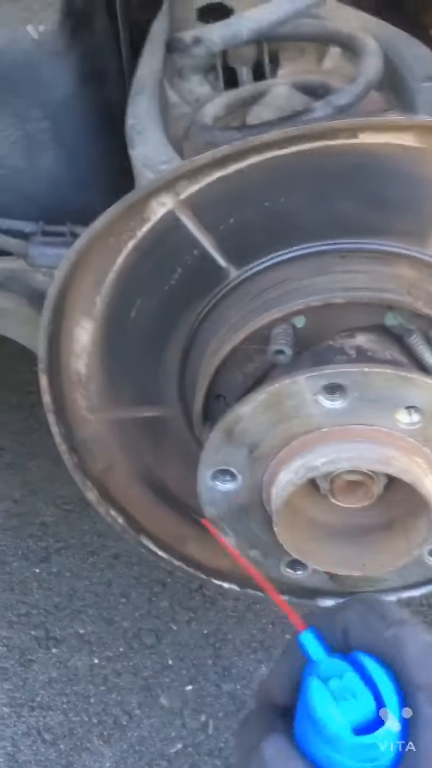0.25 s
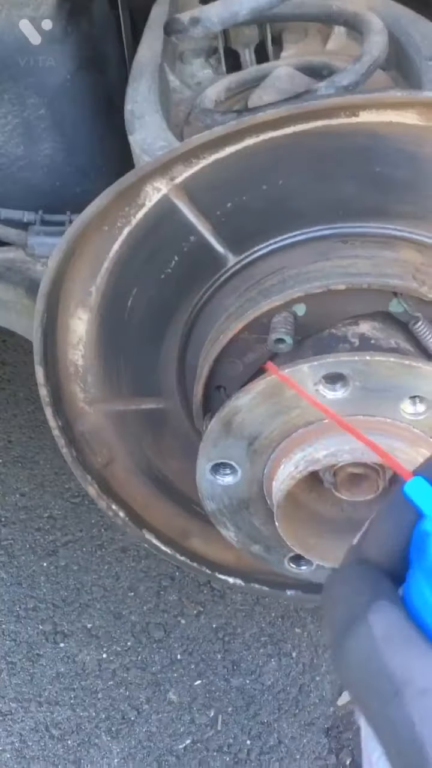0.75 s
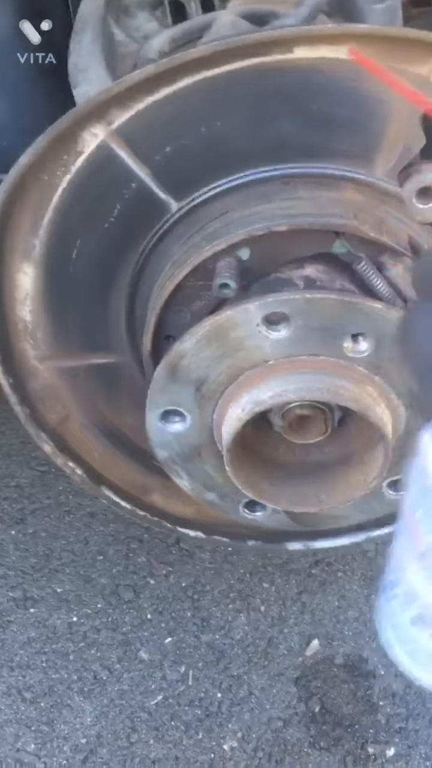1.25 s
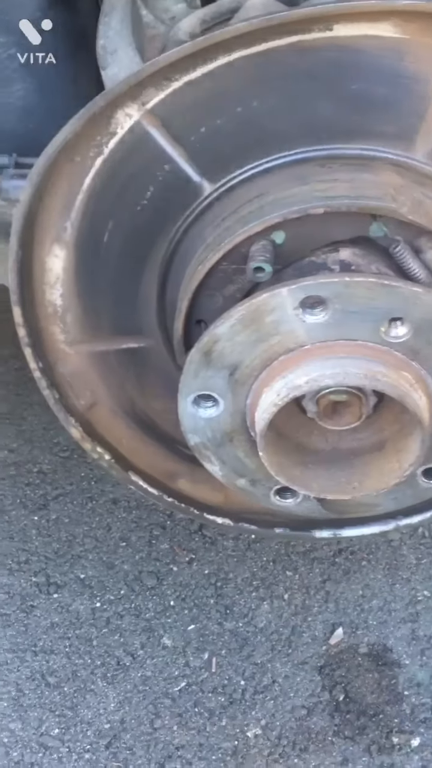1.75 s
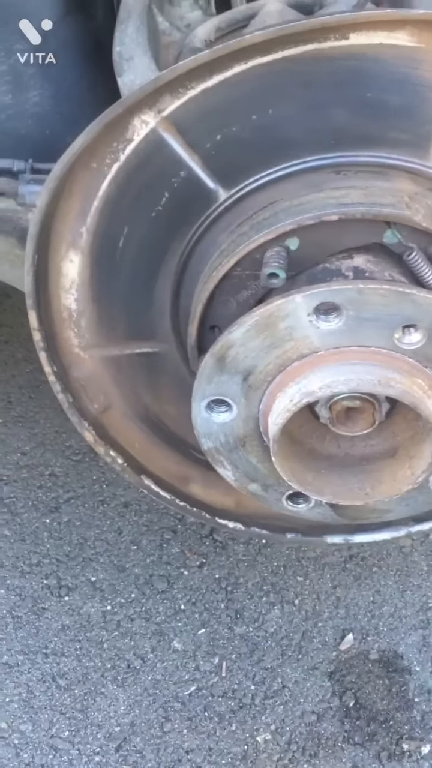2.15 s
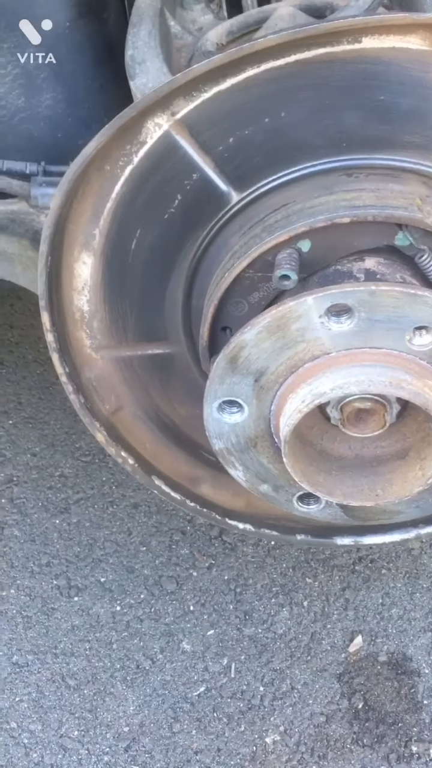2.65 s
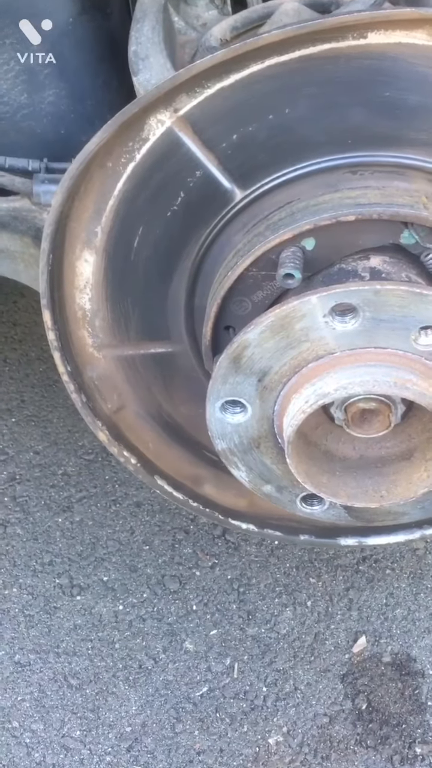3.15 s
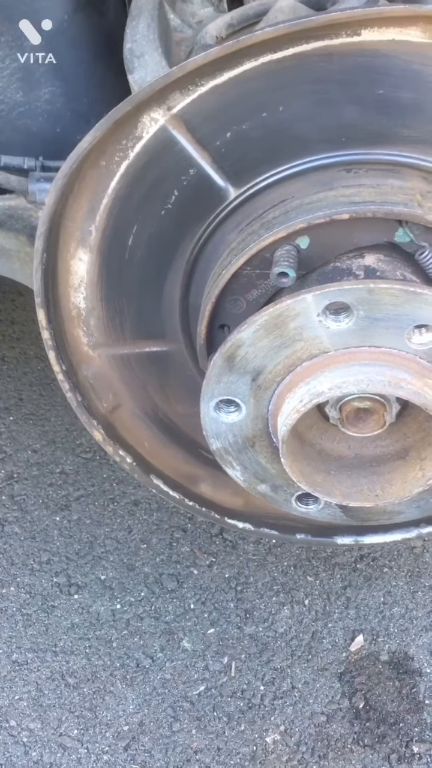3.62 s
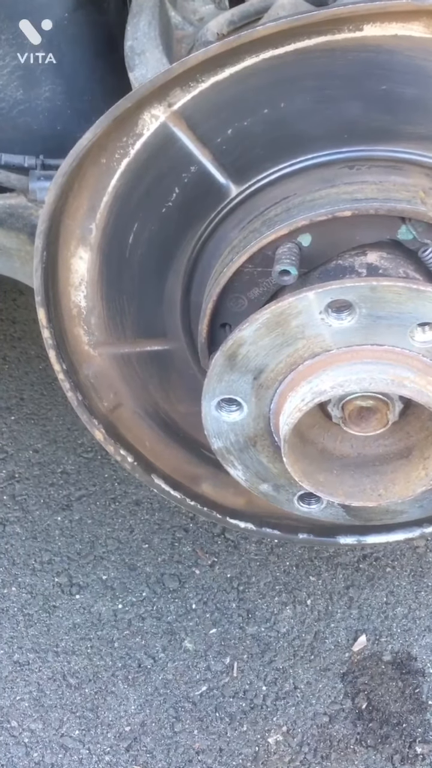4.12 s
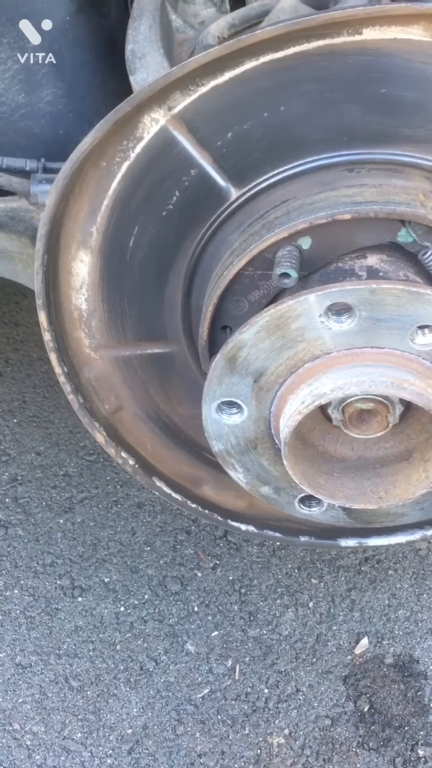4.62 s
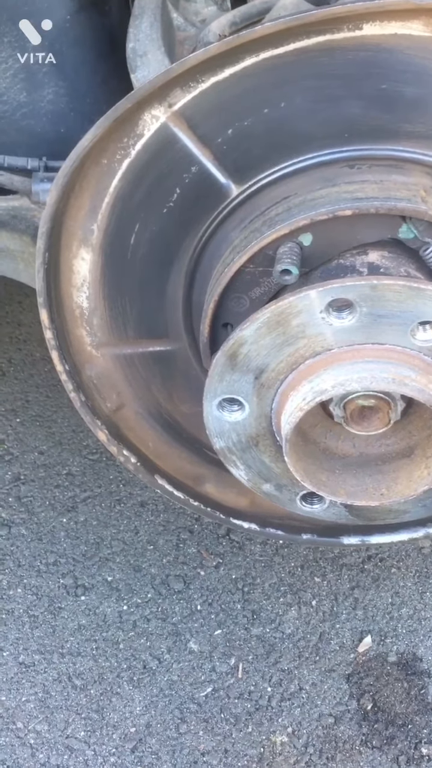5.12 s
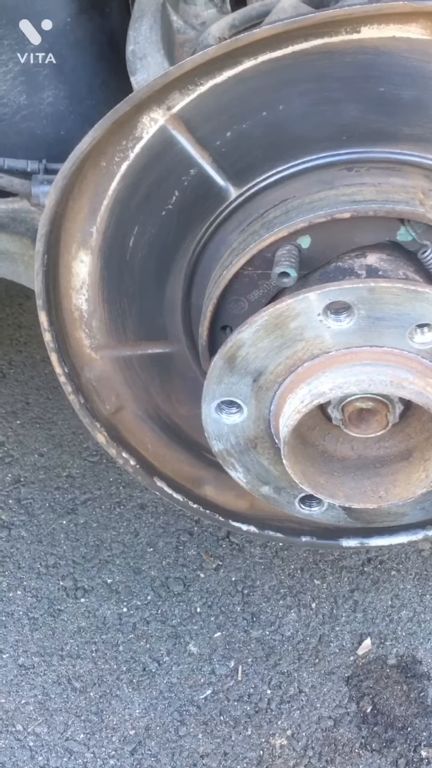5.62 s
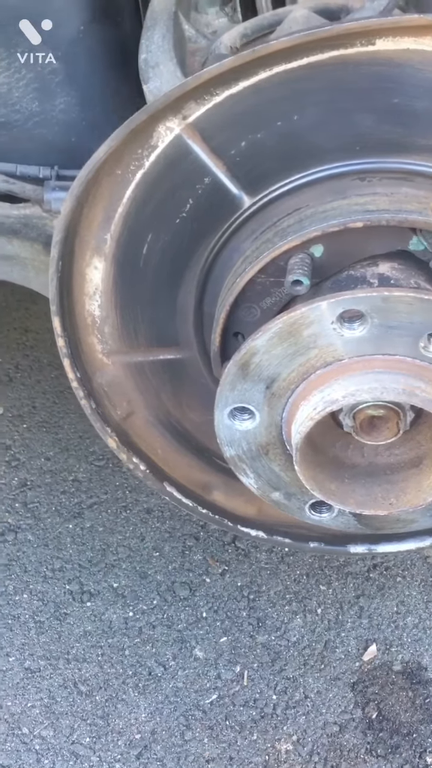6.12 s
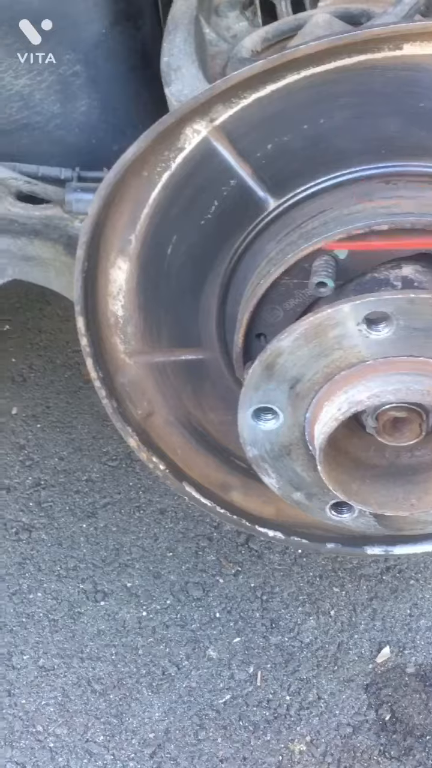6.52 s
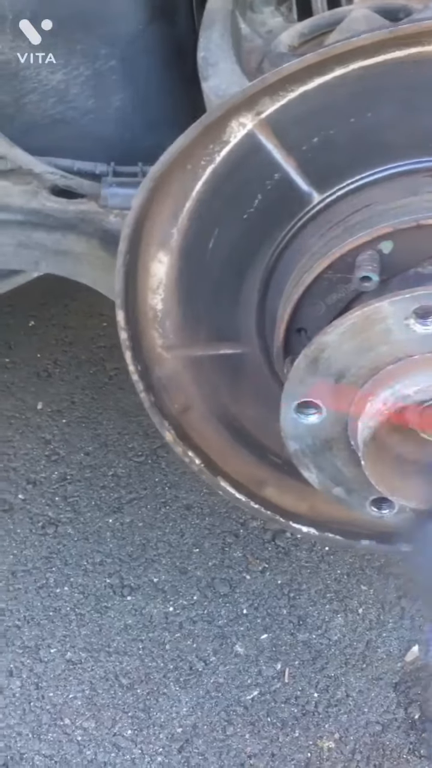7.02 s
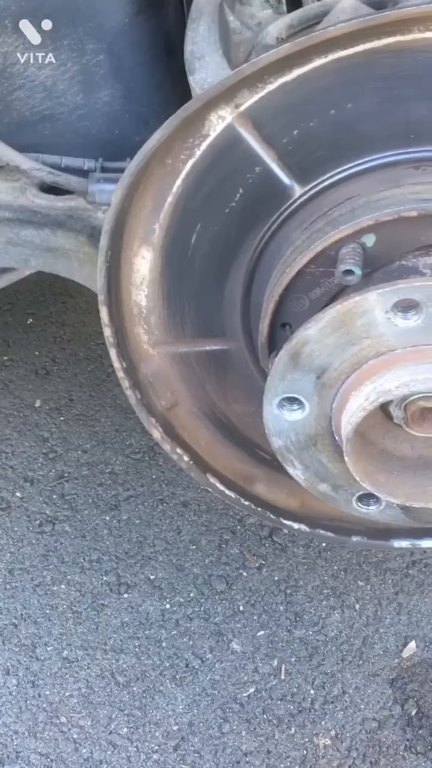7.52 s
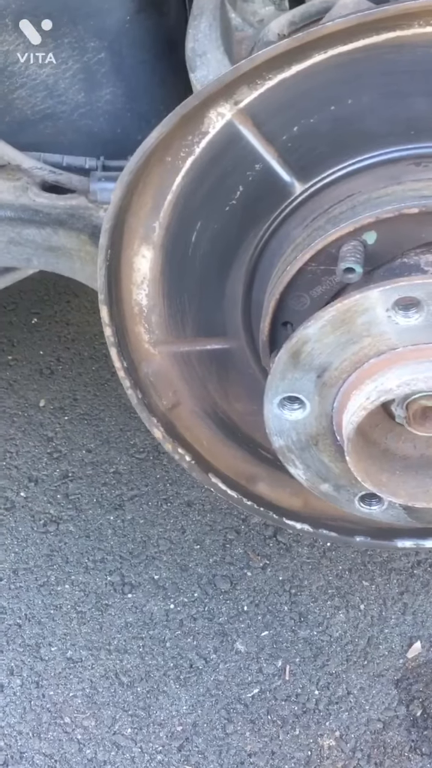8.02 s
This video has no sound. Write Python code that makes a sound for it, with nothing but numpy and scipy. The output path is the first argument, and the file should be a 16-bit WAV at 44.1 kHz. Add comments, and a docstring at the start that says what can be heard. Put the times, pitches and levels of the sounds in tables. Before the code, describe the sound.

Close, loud spray-can bursts hiss and splash against hollow steel, about three a second, with one straw tap before a final sustained hiss.

```python
"""Outdoors by a car: an aerosol can with a thin straw is sprayed in bursts into a steel brake drum, close by.
The jet hisses, splashes and sounds the drum's hollow: shaped noises gated by one valve. Steel modes ring on.
Its wind gusts and thuds on the microphone, a dry puff falls between two bursts, the straw taps the hub once.
Traffic rumbles far off, the air is still and an insect buzzes: slow noises. The loudest peaks clip."""
import sys
import numpy as np
from scipy import signal
from scipy.io import wavfile
from scipy.ndimage import uniform_filter1d, map_coordinates

SR = 44100
rng = np.random.default_rng(int(sys.argv[2]) if len(sys.argv) > 2 else 0)


def transcribe(u):
    """Save the signal u as a 16-bit wav file named by the first command-line argument.

    u: samples, shape (n,) or (channels, n), limited to [-1, 1]; the rate is SR.
    q: integer samples, one column per channel.
    """
    v = np.clip(np.atleast_2d(u).T, -1, 1)
    q = np.round(v * 32767).astype(np.int16)
    wavfile.write(sys.argv[1], SR, q)


def field_ratio(decibels):
    """Amplitude ratio for a level in dB (20 dB per decade); scalars and array-likes work."""
    return 10 ** (np.asarray(decibels, dtype=float) / 20)


N = 364266
T = np.arange(N) / SR

# spray bursts, one list each, valve fully open to start of closing: t/s, jet level/dB, drum over jet/dB
BURST_PATHS = [
    [(0.0, -16.5, -1), (0.054, -17.5, -14), (0.12, -19.5, -11.5)],
    [(0.26, -11.5, -19), (0.306, -16.5, -14), (0.322, -10.5, -15.5), (0.362, -22.5, -5),
     (0.398, -18.5, -15), (0.425, -22, -3.5)],
    [(0.575, -13.5, -14.5), (0.631, -14.5, -3), (0.725, -16, -3.5), (0.735, -17.5, -6.5)],
    [(0.88, -15, -14.5), (0.884, -15.5, -9.5), (0.95, -14.5, -5), (1.052, -16, -12.5),
     (1.065, -17.5, -13.5)],
    [(1.207, -15, -7.5), (1.219, -17, -8), (1.301, -15, -11), (1.369, -17.5, -2.5), (1.383, -8.5, -8.5),
     (1.39, -14.5, -10.5)],
    [(1.548, -9, -1), (1.572, -10.5, 5), (1.622, -12, -1.5), (1.716, -16.5, 5.5), (1.725, -14.5, 4)],
    [(1.873, -14.5, 6.5), (1.877, -15.5, 2.5), (1.977, -13.5, -7.5), (2.011, -15, -3.5),
     (2.083, -5.5, -9.5), (2.092, -19, -6)],
    [(2.24, -18.5, 7.5), (2.268, -16.5, 1.5), (2.29, -11.5, -1.5), (2.344, -10, -6), (2.432, -17.5, 3.5)],
    [(2.613, -9, -4), (2.669, -8, -8.5), (2.763, -16, 4), (2.807, -8.5, -7), (2.836, -15, -2)],
    [(2.988, -11.5, -4.5), (3.004, -7.5, -12), (3.194, -11, -12), (3.208, -12.5, 3)],
    [(3.375, -14, 2), (3.385, -12.5, -3), (3.443, -9, -20), (3.487, -16.5, 0), (3.607, -13, -6.5),
     (3.612, -20.5, 1.5)],
    [(3.763, -11.5, -6), (3.829, -19.5, 7), (3.957, -19, 2.5), (3.977, -11.5, -10), (3.983, -16.5, -10)],
    [(4.147, -6, -6.5), (4.183, -8.5, -15.5), (4.289, -11, -18.5), (4.331, -9.5, -7.5),
     (4.347, -11.5, -13.5), (4.363, -18.5, 1.5)],
    [(4.502, -8.5, -6.5), (4.516, -7, -14), (4.702, -13, -12.5), (4.705, -15.5, -6)],
    [(4.83, -16.5, -13), (4.862, -15, -16), (5.01, -16.5, -13.5), (5.013, -18, -10)],
    [(5.102, -13, -13), (5.144, -6, -17.5), (5.303, -15, -9)],
    [(5.397, -10, -14), (5.407, -8.5, -14), (5.457, -11.5, -11.5), (5.501, -10, -15.5), (5.577, -11.5, -13),
     (5.6, -20.5, -6)],
    [(5.737, -12, -10.5), (5.759, -9, -13.5), (5.847, -12, -10), (5.905, -8, -19.5), (5.933, -19.5, -6.5)],
    [(6.081, -8.5, -9.5), (6.185, -17.5, -2), (6.263, -9, -14), (6.28, -21.5, -1)],
    [(6.42, -20, -4), (6.466, -17, -3), (6.588, -18, -5), (6.613, -17.5, -14)],
    [(6.737, -16.5, -24), (6.751, -15, -18), (6.901, -19, -15), (6.923, -14, -12), (6.939, -14.5, -20),
     (6.945, -23.5, -7.5)],
    [(7.185, -18, -11), (7.193, -18, -3), (7.257, -20, -8), (7.277, -11, -19.5), (7.341, -13.5, 2),
     (7.472, -18, 2.5)],
    [(7.676, -12, -3), (7.682, -12.5, 1.5), (7.818, -13.5, -3), (7.892, -16, 5), (7.928, -11.5, -9),
     (7.98, -20, 3.5), (8.032, -18, 9), (8.104, -10, -13.5), (8.152, -14, -3.5), (8.26, -15, -12.5)],
]
# modes of backing plate and drum: f/Hz, relative level/dB, t60/s
SHELL_MODES = [(869, 0, .6), (950, -2, .5), (1040, -3, .4), (1392, -6, .4), (1625, -6, .4), (2363, -7, .4),
               (2412, -7, .5), (2665, -9, .4), (2815, -9, .6), (3015, -9, .4), (3095, -8, .6),
               (3270, -9, .4), (3870, -13, .4), (4013, -12, .4), (4837, -14, .5), (5108, -12, .9),
               (7210, -14, .4), (8269, -14, .7), (9227, -16, .5), (11528, -16, .7), (15057, -17, .6)]
# modes of the hub: f/Hz, relative level/dB, t60/s
HUB_MODES = [(5146, 0, .78), (8290, -8, .5), (11567, 0, .5), (15651, -8, .5)]
# colour of tap and puff: f/Hz, relative density/dB per Hz
CRACK_COLOUR = [(600, -25.5), (1500, -12), (4000, -14.5), (8000, -7), (12500, -1.5), (15700, 2.5)]


def unit(x):
    """Scaled to rms 1."""
    return x / np.sqrt(np.mean(x ** 2) + 1e-20)


def along(points, hz):
    """(f/Hz, level/dB) points read on a log frequency axis, -90 dB outside."""
    f, v = np.transpose(points)
    return np.interp(np.log(hz + 1), np.log(f + 1), v, -90, -90)


def curve(points):
    """(t/s, value) points read along the scene."""
    return np.interp(T, *np.transpose(points))


def wobble(rate_hz):
    """A smooth random curve, rate_hz knots a second."""
    return map_coordinates(rng.standard_normal(int(N * rate_hz / SR) + 4), [T * rate_hz])


def bump(s, ms):
    """A Gaussian of height 1 and standard deviation ms."""
    return np.exp(-.5 * ((T - s) * 1000 / ms) ** 2)


def noise(colour_db, stripes_db, patchy_db, size=512):
    """Noise of rms 1: random stripes stand for echoes off near parts, brief patches for turbulence."""
    hz, t, z = signal.stft(rng.standard_normal(N), SR, nperseg=size)

    def field(bins, frames):
        rough = rng.standard_normal(z.shape)
        return unit(uniform_filter1d(uniform_filter1d(rough, bins, 0), frames, 1))

    texture_db = stripes_db * field(2, 36) + patchy_db * field(14, 6)
    gain = field_ratio(colour_db(hz[:, None], t) + texture_db)
    gain /= np.sqrt(np.mean(gain ** 2, 0))  # colour leaves the level alone
    return unit(signal.istft(z * gain, SR, nperseg=size)[1][:N])


def steady(points):
    """A colour that does not change in time."""
    return lambda hz, t: along(points, hz) + 0 * t


def ringing(modes):
    """Impulse response, 1 s long: a sum of decaying sines."""
    t = T[:SR]
    return sum(field_ratio(db - 60 * t / t60) * np.sin(2 * np.pi * hz * t) for hz, db, t60 in modes)


def valve_db():
    """0 dB while open; the opening is steep at first and rounds off, the closing is a straight dB ramp."""
    # how briskly the finger works the valve, per burst: opening steepness/(1/ms), closing rate/(dB/ms)
    valve_rates = [(1.5, 1), (1.3, 1.5), (1.3, 1.5), (1.43, 1.5), (1.5, 1.5), (1.66, 2.5), (1.92, 1),
                   (1.4, 2), (1.8, 1.5), (1.8, 3), (1.87, 2), (1.8, 1.5), (1.7, 2), (1.7, 1), (1.24, 1.5),
                   (1.5, 1.5), (1.8, 1.5), (1.9, 1.5), (2.3, 1), (1.37, 1.5), (1.2, 1.2), (1, 2),
                   (1.36, 1.5)]
    edges = []
    for path, (up, down) in zip(BURST_PATHS, valve_rates):
        before_ms = np.maximum(1000 * (path[0][0] - T), 0)
        opening = -.3 * (up * before_ms) ** 1.368
        closing = 1000 * (path[-1][0] - T) * down
        edges.append(np.minimum(opening, closing))
    return np.max(edges, 0)


def hollow_colour(burst, pocket_db):
    """Drum resonances under a window around the aim's centre, with a narrow pocket resonance there."""
    # drum resonances: f/Hz, width/Hz, level before the rim offset/dB
    hollow_peaks = [(1439, 120, 8), (1893, 29, 7.5), (2404, 390, -4.5), (3080, 240, -5), (3424, 210, -4.5),
                    (3900, 240, -8.5), (4670, 55, -8)]
    # aim drifting over the drum: t/s, centre of its answer f/Hz, narrowness/(dB/octave^2)
    aim_path = [(0, 2050, 9.5), (.3, 2460, 8), (.7, 2220, 12), (.97, 2564, 14), (1.3, 2240, 14),
                (1.6, 2890, 13.5), (1.9, 2355, 13.5), (2.3, 2930, 14.5), (3.1, 3030, 16.5),
                (3.85, 3060, 20), (4.25, 2960, 17.5), (4.9, 2955, 16.5), (5.8, 2924, 14.5),
                (6.2, 2630, 18.5), (6.6, 2350, 15.5), (7.22, 2000, 15.5), (7.36, 2775, 17),
                (7.681, 2350, 15.5), (7.8, 2830, 34.5), (8.05, 3020, 50), (8.26, 3026, 23)]
    rim_db = -3.5  # on resonances under 2.1 kHz

    def colour_db(hz, t):
        when, centre_hz, narrow = np.transpose(aim_path)
        peaks = sum(field_ratio(2 * (db + rim_db * (c < 2100))) / (1 + (2 * (hz - c) / w) ** 2)
                    for c, w, db in hollow_peaks)
        octaves = np.log2((hz + 1) / np.interp(t, when, centre_hz))
        pocket = pocket_db[burst(t)] / (1 + (octaves / 0.063) ** 2)
        window = np.minimum(np.interp(t, when, narrow) * octaves ** 2, 60)
        return 10 * np.log10(peaks + field_ratio(-22.5)) + pocket - window

    return colour_db


def spray():
    """Jet, splash, drum hollow and low blow share the valve, the brief changes and the sputter of the flow."""
    # brief changes in the spray: spurts, dips and low gusts of its wind on the microphone:
    # t/s, level change/dB, Gaussian length/ms, extra low change/dB (full on blow, 0.27 on drum)
    brief_changes = [(0.02, -1.5, 16, 6), (0.11, 0, 15, 3), (0.322, 5, 13, -0.5), (0.316, -1.5, 4.5, 20),
                     (0.421, 4.5, 3.7, 7), (1.382, 5, 5.3, -10), (3.385, 3.5, 9.8, -3.5), (4.59, -2, 19, 8),
                     (4.707, -3, 2.2, 8.5), (4.995, 3, 6, 8), (6.78, 0.5, 32, 2), (6.93, 2.5, 16, -8.5),
                     (7.345, -1, 25, 5), (8.015, 0, 14, 3.5), (8.09, 5.5, 11, -2)]
    # jet cut off rhythmically as it sweeps a coil spring:
    # first dip t/s, end t/s, rate f/Hz, depth/dB (full on drum and blow, 0.36 on jet, 0.6 on splash)
    flutter = (7.327, 7.465, 38.5, 13)
    # what each burst lands on, before the drum-following shares: splash over jet/dB, blow over jet/dB,
    # blow centre f/Hz, pocket resonance at the aim's centre/dB
    landings = [(-6.5, -3.5, 670, -0.5), (-5, -14.5, 710, -0.5), (-8, -13.5, 690, 1), (-5.5, -12, 800, 2),
                (-5, -11.5, 800, -2.5), (-3, -15, 900, 9.5), (-7.5, -20.5, 780, 4.5), (-3, -16, 950, 1.5),
                (-3.5, -21, 900, 7), (-6.5, -25, 820, 6.5), (-2, -16.5, 900, 1.5), (-3.5, -17, 880, 5.5),
                (-5, -22, 870, 5.5), (-4.5, -19.5, 660, 6.5), (-7, -19, 800, -1), (-5, -22.5, 630, 8.5),
                (-4, -20.5, 800, 3.5), (-3.5, -23, 850, -3), (-2, -22.5, 910, 3), (-8.5, -14, 880, 5.5),
                (-5, -6.5, 480, 2), (-6.5, -14, 920, 1.5), (-4, -16, 990, 8.5)]
    # colours: f/Hz, relative density/dB per Hz; the blow's as when centred on 900 Hz
    jet_colour, splash_colour, blow_shape = [(1200, -23.5), (3000, -19), (6000, -20), (8000, -9),
                                             (9700, -2.5), (10500, -5.5), (11800, -0.5), (14000, -1),
                                             (15700, 3)], [(2500, -7.5), (4000, -10), (4500, -5), (5000, -6),
                                                          (5600, -1.5), (6300, 0), (7500, -5), (9500, -6)], [(100, -19.5), (200, -3),
                                                                          (320, -3), (480, -10.5),
                                                                          (700, 0.5), (1100, 2), (1500, -1),
                                                                          (2500, -12)]

    s, *cols = np.concatenate(BURST_PATHS).T
    jet_db, drum_db = [np.interp(T, s, c) for c in cols]
    splash_db, blow_db, blow_hz, pocket_db = np.transpose(landings)

    def burst(t):
        """Index of the burst, stepping 40 ms ahead of each."""
        return np.searchsorted([path[0][0] - .04 for path in BURST_PATHS[1:]], t)

    # dB gained for each dB of the drum's answer: 0.37, 0.46
    splash_db = splash_db[burst(T)] + 0.37 * drum_db + 1.5 * wobble(18)
    blow_db = blow_db[burst(T)] + 0.46 * drum_db + 1.3 * wobble(18)

    change_db = sum(db * bump(t, ms) for t, db, ms, _ in brief_changes)
    low_db = sum(db * bump(t, ms) for t, _, ms, db in brief_changes)
    sputter_db = 0.2 * wobble(45) + 0.55 * wobble(220)
    flow_db = jet_db + valve_db() + change_db + sputter_db

    start, end, rate_hz, depth_db = flutter
    during = (T > start - .25 / rate_hz) * (T < end)
    flap_db = -depth_db * np.maximum(np.cos(2 * np.pi * rate_hz * (T - start)), 0) * during

    def blow_colour(hz, t):
        """The shape slides with the blow's centre."""
        return along(blow_shape, hz * 900 / blow_hz[burst(t)])

    jet_gain = field_ratio(flow_db + 0.36 * flap_db)
    jet = jet_gain * noise(steady(jet_colour), stripes_db=1.5, patchy_db=-0.9)
    splash_gain = field_ratio(flow_db + splash_db + 0.6 * flap_db + 0.9 * wobble(70))
    splash = splash_gain * noise(steady(splash_colour), stripes_db=2.3, patchy_db=1.1)
    drum_gain = field_ratio(flow_db + drum_db + flap_db + 0.27 * low_db + 0.75 * wobble(70))
    drum = drum_gain * noise(hollow_colour(burst, pocket_db), stripes_db=3.0, patchy_db=2.84)
    blow_gain = field_ratio(flow_db + blow_db + flap_db + low_db + 0.65 * wobble(40))
    blow = blow_gain * noise(blow_colour, stripes_db=3.0, patchy_db=4.0)
    return jet + splash + drum + blow


def yard(x):
    """Steel rings on faintly; the car's underside and the ground send back a short tail."""
    t = T[:SR // 2]
    tail = rng.standard_normal(len(t)) * (field_ratio(-60 * t / 0.054) + field_ratio(-31.5 - 60 * t / 0.28))
    tail /= np.linalg.norm(tail)
    steel = field_ratio(-80) * ringing(SHELL_MODES) + field_ratio(-98) * ringing(HUB_MODES)
    return signal.fftconvolve(x, steel)[:N] + field_ratio(-11.5) * signal.fftconvolve(x, tail)[:N]


def low_rumble():
    """Low noise: far traffic drifting in level, plus brief swells of the jet's wind on the microphone."""
    # far traffic: t/s, level/dB
    traffic_path = [(0, -38), (1.4, -35), (1.66, -41), (2.3, -31.5), (2.7, -36), (4.45, -34), (4.8, -38.5),
                    (5.4, -36), (5.8, -38.5), (7.3, -33.5), (7.9, -34), (8.26, -31.5)]
    # jet's wind on the microphone, raising the rumble: t/s, swell/dB, Gaussian length/ms
    wind_swells = [(.18, 6, 27), (.335, 8.5, 11), (1.84, 7.5, 53), (6.37, 6.5, 37), (6.79, 7, 27),
                   (6.99, 3.5, 72), (7.36, 10.5, 38), (7.66, 2, 25)]
    # f/Hz, relative density/dB per Hz
    rumble_colour = [(22, -28), (35, -14), (48, -2.5), (57, 3), (70, 2), (85, -4), (105, -4), (150, -12.5),
                     (250, -20.5), (420, -28), (600, -53)]
    wind_db = sum(db * bump(s, ms) for s, db, ms in wind_swells)
    gain = field_ratio(curve(traffic_path) + wobble(7) + wind_db)
    return gain * noise(steady(rumble_colour), stripes_db=-0.5, patchy_db=-1.0, size=8192)


def still_air():
    """Smooth still air: noise of constant level."""
    # f/Hz, relative density/dB per Hz
    air_colour = [(200, -11.5), (300, -9), (550, -15), (950, -12), (1300, -20), (3000, -25.5), (5500, -31),
                  (9000, -32.5), (15700, -37.5)]
    return field_ratio(-54) * noise(steady(air_colour), stripes_db=0.0, patchy_db=-1.5)


def insect():
    """A buzz: narrow band of noise around 7 kHz that swells and fades."""
    # t/s, level/dB
    buzz_path = [(0, -63), (1.5, -63.5), (3.3, -71), (3.72, -59), (4.06, -58.5), (4.4, -77.5), (5.7, -74),
                 (6.68, -59.5), (7.6, -69), (8.26, -69)]
    # f/Hz, relative density/dB per Hz
    buzz_colour = [(5800, -29.5), (6600, -0.5), (7000, -0.5), (7400, -4.5), (8200, -27.5)]
    gain = field_ratio(curve(buzz_path) + 3 * wobble(30))
    return gain * noise(steady(buzz_colour), stripes_db=-5, patchy_db=-1.5)


def buffets():
    """Gas thrown back thuds on the microphone: short low lumps of turbulence."""
    # t/s, peak gain/dB, Gaussian length/ms
    thuds = [(.322, -32, 10), (4.6, -34, 30), (4.71, -35, 6.5), (7.36, -34.5, 40)]
    # f/Hz, relative density/dB per Hz
    thud_colour = [(90, -14), (140, 1), (220, 1), (350, -6), (550, -8.5), (800, -25.5)]
    gain = sum(field_ratio(db) * bump(s, ms) for s, db, ms in thuds)
    return gain * noise(steady(thud_colour), stripes_db=1.5, patchy_db=-1.5, size=1024)


def singing():
    """Modes left singing: each builds up under the end of a burst and dies at its own rate."""
    # t/s, mode f/Hz, peak level/dB
    sung_modes = [(.744, 950, -50), (.744, 2363, -55), (1.075, 869, -48), (1.075, 2412, -58),
                  (1.401, 2412, -57), (1.401, 2665, -59), (1.735, 1040, -50), (1.735, 1392, -50),
                  (1.735, 3270, -49), (2.102, 2815, -47), (2.846, 3095, -57), (3.621, 869, -54),
                  (3.621, 7210, -57), (3.993, 869, -55), (3.993, 3015, -57), (4.373, 5108, -62),
                  (5.023, 1040, -51), (5.943, 5146, -61), (6.291, 869, -55), (6.624, 869, -53),
                  (6.953, 8269, -62), (6.953, 11528, -61)]
    t60 = {hz: t for hz, _, t in SHELL_MODES + HUB_MODES}
    out = np.zeros(N)
    for s, hz, db in sung_modes:
        fade_db = np.where(T < s, 400 * (T - s), -60 * (T - s) / t60[hz])
        phase = 2 * np.pi * rng.random()
        out += field_ratio(db + fade_db) * np.sin(2 * np.pi * hz * T + phase)
    return out


def puff():
    """A faint dry, bright puff of gas: noise with a sudden start and exponential decay."""
    # t/s, starting level/dB, t60/s
    puff_setting = (4.054, -48, .1)
    s, db, t60 = puff_setting
    gain = field_ratio(db - 60 * np.maximum(T - s, 0) / t60) * (T >= s)
    return gain * noise(steady(CRACK_COLOUR), stripes_db=-8.5, patchy_db=1)


def tap():
    """The straw taps the hub: a sharp click and short bright rattle, with the hub's modes ringing."""
    # t/s, crack gain ahead of its decays/dB
    tap_setting = (7.1089, -12)
    s, db = tap_setting
    after = np.maximum(T - s, 0)
    decay = field_ratio(-60 * after / .0015) + field_ratio(-5 - 60 * after / .016) + field_ratio(-18 - 60 * after / .09)
    crack = decay * (T >= s) * noise(steady(CRACK_COLOUR), stripes_db=0, patchy_db=0)
    ring = np.pad(ringing(HUB_MODES), (round(s * SR), N))[:N]
    return field_ratio(db) * crack + field_ratio(-33) * ring


def scene():
    """One microphone feeds both channels."""
    direct = spray()
    background = low_rumble() + still_air() + insect()
    mix = direct + yard(direct) + background + buffets() + singing() + puff() + tap()
    return np.tile(mix, (2, 1))


def low_pass(x):
    """Removes everything above the highest recorded frequency."""
    return signal.sosfilt(signal.butter(12, 16350, fs=SR, output="sos"), x)


def record(dry):
    """The loudest peaks clip at full scale."""
    mix = np.clip(dry, -1, 1)
    return low_pass(mix)


dry = scene()
out = record(dry)
transcribe(out)
```